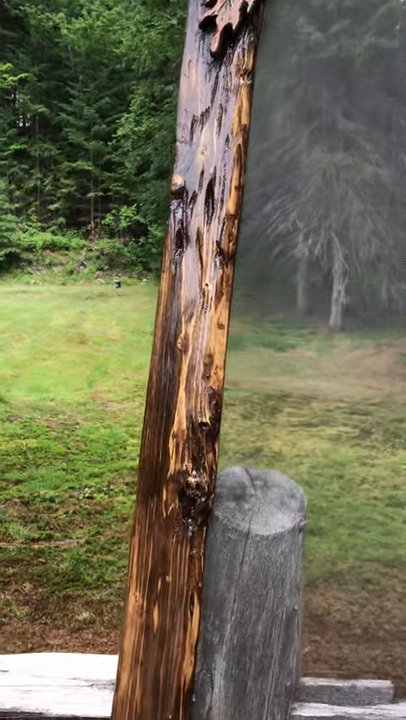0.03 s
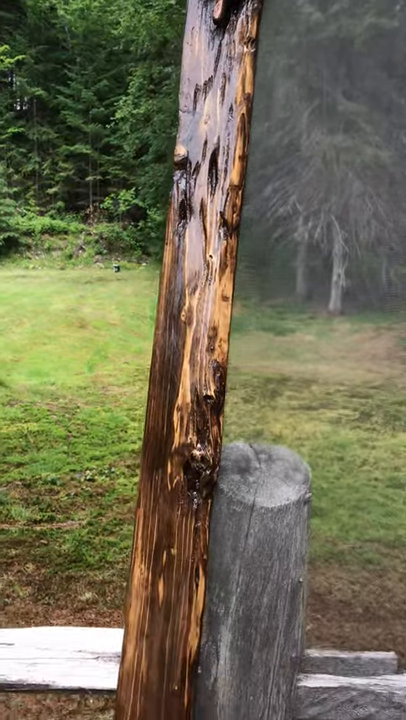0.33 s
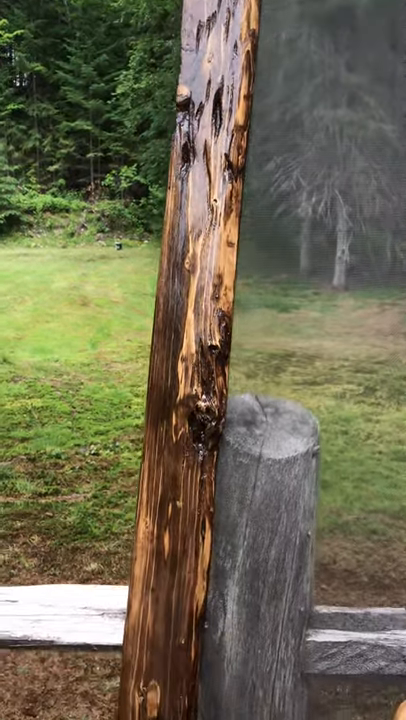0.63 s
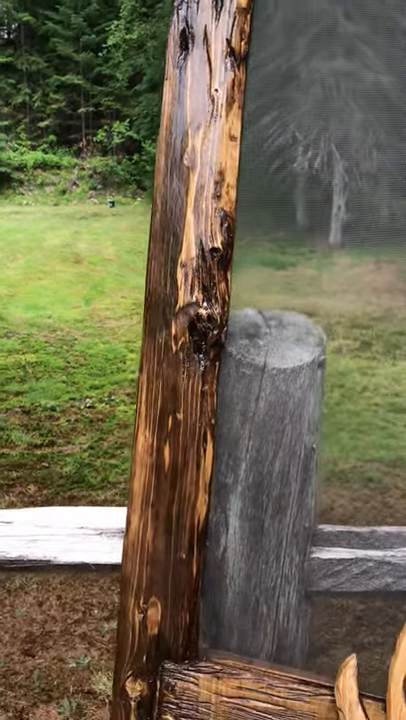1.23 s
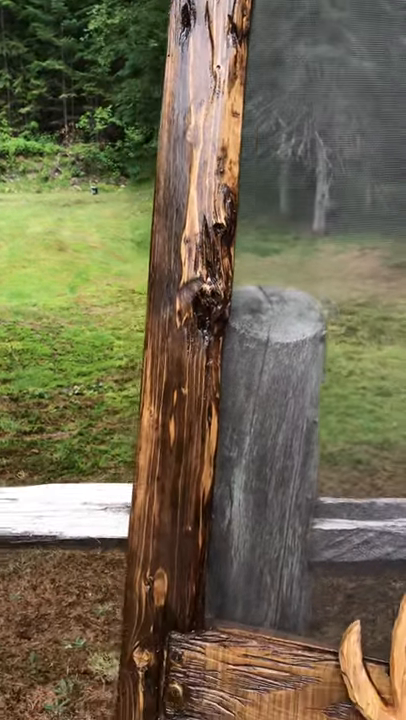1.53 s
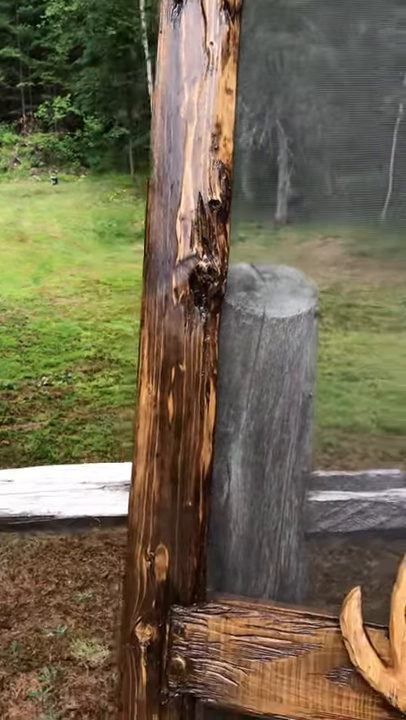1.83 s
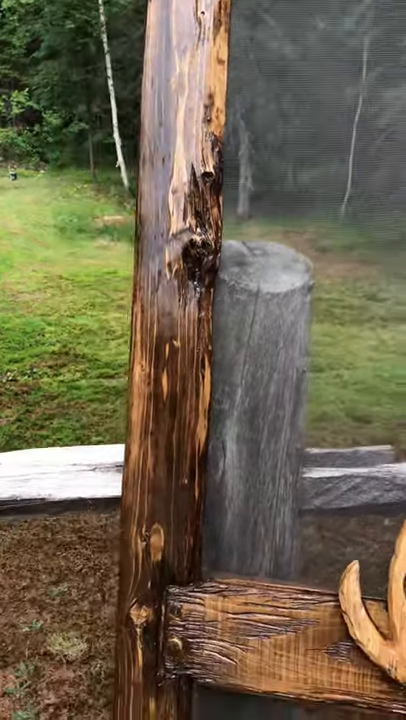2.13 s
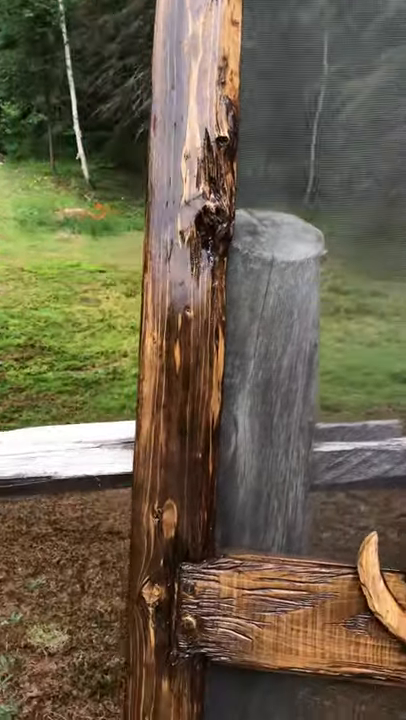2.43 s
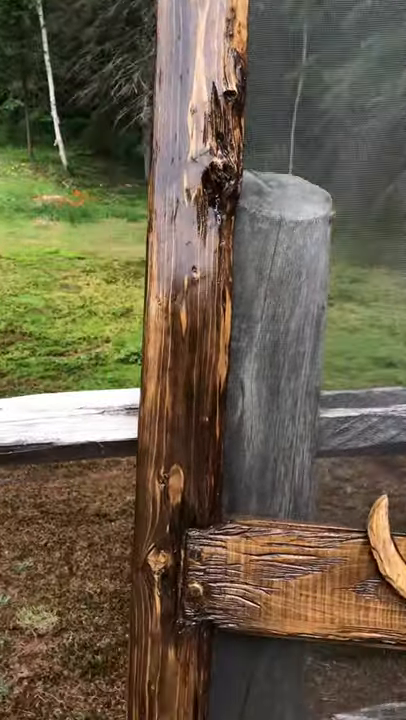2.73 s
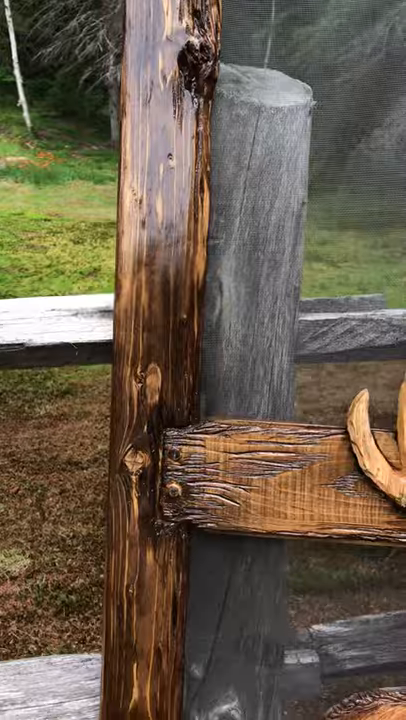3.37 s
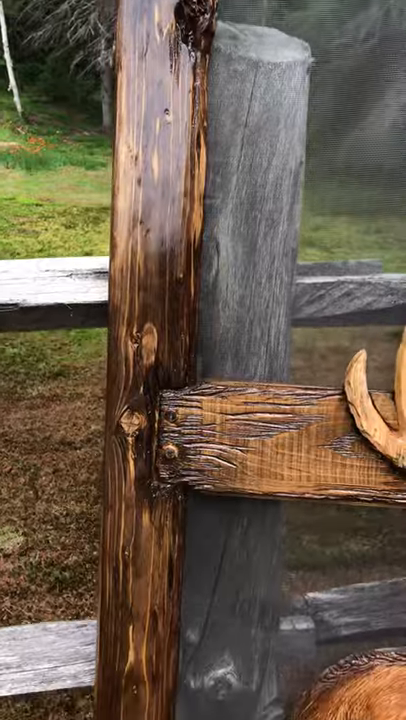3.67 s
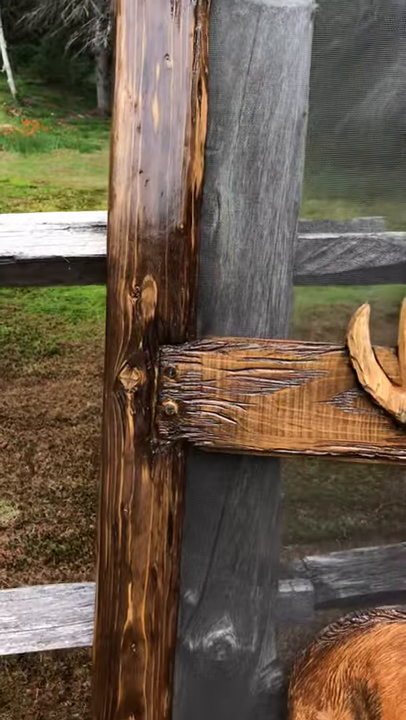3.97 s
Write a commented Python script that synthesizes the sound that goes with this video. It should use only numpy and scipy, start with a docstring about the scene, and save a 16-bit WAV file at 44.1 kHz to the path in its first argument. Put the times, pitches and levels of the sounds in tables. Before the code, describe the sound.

A high insect sizzle with short bird chirps and a low, far engine drone outdoors.

```python
"""A yard at the edge of a wood. From the start a far engine drones, insects sizzle high in the grass,
and small birds chip, peep and lisp among the trees. One nearer insect slowly comes in, its wing
strokes making a fast pulsing buzz. Around two seconds in come a light scuff and a soft knock close
by, then a breeze rumbles on the microphone. Last, the buzz grows louder, one bird sings a row of
buzzy notes, and a far trill swells."""
import sys
import numpy as np
from scipy import signal
from scipy.fft import rfft, irfft
from scipy.io import wavfile
from scipy.ndimage import uniform_filter1d

SR = 44100
rng = np.random.default_rng(int(sys.argv[2]) if len(sys.argv) > 2 else 0)


def pcm_store(signal):
    """Save signal as 16-bit PCM."""
    levels = np.round(np.clip(np.atleast_2d(signal), -1, 1) * 32767)
    wavfile.write(sys.argv[1], SR, levels.astype(np.int16).T)


N = 176400
TIME = np.arange(N) / SR


def from_db(db):
    """Turn decibels (dB) into a number to multiply a sound by."""
    return 10 ** (np.asarray(db) / 20)


def unit_power(x):
    """Scale a sound so that its average power is 1."""
    return x / np.sqrt(np.mean(x ** 2) + 1e-20)


def over_time(rows):
    """Join (seconds, value) rows with straight lines."""
    return np.interp(TIME, *np.transpose(rows))


def drift(rate_hz):
    """A smooth random wobble, about 1 in size; a higher rate wobbles faster."""
    step = 40  # samples between random points
    pole = np.exp(-2 * np.pi * rate_hz * step / SR)
    smooth = signal.lfilter([1], [1, -2 * pole, pole * pole], rng.standard_normal(N // step + 2002))
    settled = unit_power(smooth[2000:])
    return np.interp(np.arange(N) / step, np.arange(len(settled)), settled)


def noise(colour):
    """Noise of power 1. Its colour says how strong the low and high frequencies are."""
    hz, db = np.transpose(colour)
    freqs = np.maximum(np.fft.rfftfreq(N, 1 / SR), 1)
    gain = from_db(np.interp(np.log(freqs), np.log(hz), db))
    edge_fade = np.minimum(freqs / hz[0], 1) ** 2 * np.minimum(hz[-1] / freqs, 1) ** 2
    return unit_power(irfft(rfft(rng.standard_normal(N)) * gain * edge_fade, N))


def add(out, start_s, sound):
    """Mix a sound in at the given time."""
    start = max(int(start_s * SR), 0)
    out[start:start + len(sound)] += sound[:max(N - start, 0)]


def progress(length_s):
    """Run from 0 to 1 through a note."""
    return np.linspace(0, 1, max(int(length_s * SR), 2))


def whistle(hz, db, quaver):
    """A bird's note: an almost pure tone that follows a pitch path, trembles and fades in and out."""
    pitch = hz * (1 + quaver * drift(400)[:len(hz)])
    swell = np.sqrt(np.abs(np.sin(np.linspace(0, np.pi, len(hz)))))
    swell *= signal.windows.tukey(len(hz), .2)
    return from_db(db) * np.sqrt(2) * swell * np.sin(2 * np.pi * np.cumsum(pitch) / SR)


def arched_notes(rows, arch_hz=154, quaver_hz=124):
    """Short whistles whose pitch rises and falls again."""
    out = np.zeros(N)
    for start, length, top_hz, db in rows:
        pitch = top_hz - arch_hz * (2 * progress(length) - 1) ** 2
        add(out, start, whistle(pitch, db, quaver=quaver_hz / top_hz))
    return out


def among_trees(sound, echo_db, bounce_db, bounce_s=.03, echo_s=0.45):
    """The edge of the wood adds one clear bounce and a blurred echo to a sound."""
    t = np.arange(SR // 2) / SR
    tail = rng.standard_normal(len(t)) * from_db(-60 * t / echo_s) * (1 - np.exp(-t / 0.0037))
    echo = signal.fftconvolve(sound, tail / np.sqrt(np.sum(tail ** 2)))[:N]
    bounce = np.concatenate([np.zeros(int(bounce_s * SR)), sound])[:N]
    return sound + from_db(bounce_db) * bounce + from_db(echo_db) * echo


# The colour of the open air. Each row: frequency in Hz, relative strength in dB.
AIR_COLOUR = [(28, -8.5), (55, 1), (150, 3.5), (200, -6.5), (310, -7), (430, -14), (750, -16.5),
              (1080, -16), (1550, -19), (2500, -24.5), (3100, -24), (4800, -28.5), (6200, -29.5),
              (7300, -28), (12000, -34), (15500, -36.5)]
# How loud the air is. Each row: time in seconds, level in dB.
AIR_LOUDNESS = [(2.3, -59.5), (4, -60)]
def air():
    """The outdoor hush, which sinks a little in the second half."""
    return from_db(over_time(AIR_LOUDNESS)) * noise(AIR_COLOUR)


# Faint tones far away. Each row: pitch in Hz, level in dB.
DRONE_TONES = [(208, -83.5), (296, -76), (1040, -83.5)]
def drones(waver_hz=5.2):
    """Thin hums that waver at random."""
    turn = 2 * np.pi * TIME
    return sum(from_db(db) * (drift(waver_hz) * np.sin(hz * turn) + drift(waver_hz) * np.cos(hz * turn))
               for hz, db in DRONE_TONES)


# How fast the engine runs. Each row: time in seconds, speed in Hz.
ENGINE_PACE = [(0, 59), (0.35, 56.5), (0.7, 58), (1.05, 61), (1.35, 57), (1.7, 58), (2.0, 59), (2.75, 57.5),
               (3.2, 59), (4, 58.0)]
# How loud the engine is. Each row: time in seconds, level in dB.
ENGINE_LOUDNESS = [(0, -51.5), (0.12, -51.5), (0.3, -52.5), (0.6, -50.5), (0.86, -47), (1.02, -49),
                   (1.1, -51), (1.14, -47), (1.19, -52.5), (1.58, -48.5), (1.75, -46), (2.08, -50.5),
                   (2.23, -57), (2.5, -53), (2.8, -49), (3.02, -51), (3.3, -55.5), (3.6, -48), (4, -47.5)]
# The engine's tones. Each row: multiple of the speed, relative strength in dB.
ENGINE_TONES = [(1, -8.5), (2, -2), (3, -20.5), (5, -31.5), (6, -34)]
def engine(waver_db=.4):
    """The low tones of a far engine, each wavering on its way through the air."""
    turn = 2 * np.pi * np.cumsum(over_time(ENGINE_PACE)) / SR
    tones = np.zeros(N)
    for multiple, db in ENGINE_TONES:
        strength = from_db(db + waver_db * drift(15))
        tones += strength * np.sin(multiple * turn + rng.uniform(0, 2 * np.pi))
    return np.sqrt(2) * from_db(over_time(ENGINE_LOUDNESS)) * tones


# The colour of the breeze. Each row: frequency in Hz, relative strength in dB.
RUMBLE_COLOUR = [(30, -8), (45, 7), (70, -7.5), (110, 0), (200, -13.5), (500, -43)]
# The gusts. Each row: time in seconds, relative level in dB.
GUSTS = [(2.1, -54), (2.19, -64), (2.42, -75), (2.53, -44), (2.57, -59), (2.65, -45.5), (2.74, -55),
         (2.9, -55.5), (3.03, -53.5), (3.11, -59), (3.2, -48), (3.3, -72), (3.38, -72), (3.46, -51),
         (3.62, -69)]
def breeze(arrived_s=2.16, fade_in_s=0.1, gain_db=-2):
    """Gusts of wind rumble on the microphone."""
    rumble = noise(RUMBLE_COLOUR)
    even_rumble = rumble / np.sqrt(uniform_filter1d(rumble ** 2, size=3000))
    fade_in = np.clip(1 + (TIME - arrived_s) / fade_in_s, 0, 1)
    return fade_in * from_db(gain_db + over_time(GUSTS)) * even_rumble


# The colour of the far trill. Each row: frequency in Hz, relative strength in dB.
TRILL_COLOUR = [(4600, -8), (5500, 1.5), (6500, -1), (7200, 1), (8000, -33)]
# Its late swell. Each row: time in seconds, level in dB.
TRILL_SWELL = [(2.6, -95), (3.65, -78)]
def far_trill(flutter_db=3.0):
    """A distant bird, blurred into a high, fluttering hiss."""
    return noise(TRILL_COLOUR) * from_db(over_time(TRILL_SWELL) + flutter_db * drift(38))


# The dull and the gritty part of a touch. Each row: frequency in Hz, relative strength in dB.
BODY_COLOUR = [(200, -1), (1080, 1), (1400, -1), (1630, 3), (1820, 1), (2900, -5), (3300, -2), (4000, -10),
               (8000, -16.5), (15000, -37)]
GRIT_COLOUR = [(2000, -12), (4500, -9), (6300, -3), (7500, -10), (10000, -5), (15500, -4)]
# Light touches close by. Each row: peak time, rise and fall in seconds, body and grit levels in dB.
TOUCHES = [(.28, .03, 0.03, -72, -72), (1.765, 0.051, 0.04, -63.5, -71), (1.808, 0.022, 0.083, -66, -71),
           (1.805, 0.02, 0.011, -90, -61), (2.003, 0.013, 0.016, -60.5, -70),
           (2.035, 0.028, 0.16, -64.5, -81)]
def touches(grain_db=3.0):
    """A faint rustle, a scuff and a soft knock: each a dull body of noise with fine grit on top."""
    body = noise(BODY_COLOUR) * from_db(grain_db * drift(270))
    grit = noise(GRIT_COLOUR) * from_db(grain_db * drift(270))
    out = np.zeros(N)
    for peak, rise, fall, body_db, grit_db in TOUCHES:
        age = TIME - peak
        swell = np.exp(-np.maximum(-age / rise, age / fall))
        out += swell * (from_db(body_db) * body + from_db(grit_db) * grit)
    return out


# High peeps further off. Each row: start in seconds, length in seconds, top pitch in Hz, level in dB.
PEEP_NOTES = [(.815, 0.028, 5850, -71), (1.825, 0.034, 5860, -68), (2.446, 0.032, 5720, -70.5),
              (2.932, 0.044, 5700, -72.5), (3.522, 0.031, 5750, -71)]
# Thin lisps. Each row: start in seconds, starting pitch in Hz, level in dB.
LISP_NOTES = [(0.572, 8290, -67), (0.667, 8420, -64), (1.218, 8350, -66.5), (1.243, 8200, -67),
              (1.355, 8300, -67.5), (1.573, 8440, -66.5), (2.111, 8750, -67), (2.207, 8770, -65.5),
              (2.862, 8730, -68.5), (2.95, 8620, -66.5)]
def bird_calls(lisp_s=0.0394, fall_hz=642, bend=1.74):
    """Birds in the trees whistle arched peeps and falling lisps."""
    out = arched_notes(PEEP_NOTES)
    for start, start_hz, db in LISP_NOTES:
        pitch = start_hz - fall_hz * progress(lisp_s) ** bend
        add(out, start, whistle(pitch, db, quaver=0.0087))
    return among_trees(out, echo_db=-5, bounce_db=-6)


# Lower chips. Each row: start in seconds, length in seconds, top pitch in Hz, level in dB.
CHIP_NOTES = [(.274, 0.022, 3037, -65.5), (.807, 0.012, 3420, -72), (.85, 0.011, 2940, -64.5),
              (0.853, 0.015, 3470, -71), (0.865, 0.0056, 3050, -59.5), (1.863, 0.027, 3130, -67),
              (1.893, 0.013, 3110, -66), (2.465, 0.0245, 3130, -67), (2.965, 0.03, 3130, -67),
              (2.997, 0.02, 3270, -70), (3.559, 0.022, 3230, -65)]
def bird_chips():
    """A near bird gives very short arched notes, with less echo than the others."""
    return among_trees(arched_notes(CHIP_NOTES), echo_db=-7, bounce_db=-19)


# A song of buzzy notes. Each row: start in seconds, middle pitch in Hz, level in dB.
SONG_NOTES = [(2.615, 3980, -77.5), (2.736, 3950, -74), (2.862, 3950, -71.5), (2.989, 3970, -71.5),
              (3.115, 4000, -72), (3.245, 4060, -73), (3.374, 4090, -74), (3.503, 3840, -73),
              (3.64, 3770, -75), (3.777, 3810, -76)]
def bird_song(note_s=0.056, sweeps_per_s=88, lowest_hz=3514, slide_s=0.017, lead_s=.014):
    """A bird leads into each note with a quick downward slide, then buzzes in tiny upward sweeps."""
    out = np.zeros(N)
    sweep = (progress(note_s) * note_s * sweeps_per_s) % 1
    pulses = unit_power(np.sin(np.pi * sweep) ** 2)
    slide_hz = 5000 - 150 * progress(slide_s)
    for start, middle_hz, db in SONG_NOTES:
        add(out, start - lead_s, whistle(slide_hz, db=-77, quaver=0.013))
        pitch = middle_hz - (middle_hz - lowest_hz) * np.cos(np.pi * sweep)
        add(out, start, whistle(pitch, db, quaver=0.045) * pulses)
    return among_trees(out, echo_db=-3, bounce_db=-9)


# The colour of the insect chorus. Each row: frequency in Hz, relative strength in dB.
CHORUS_COLOUR = [(6800, -28), (7600, -17.5), (8250, -2), (8900, -2.5), (9650, -2.5), (10100, -7),
                 (10600, -16.5), (12500, -24.5)]
# How loud the chorus is. Each row: time in seconds, level in dB.
CHORUS_LOUDNESS = [(0, -68.5), (3, -69)]
def insect_chorus(flutter_db=1.1):
    """Many insects in the grass blur into one high sizzle."""
    return noise(CHORUS_COLOUR) * from_db(over_time(CHORUS_LOUDNESS) + flutter_db * drift(60))


# The colour of a wing's rasp before it sags. Each row: frequency in Hz, relative strength in dB.
WING_COLOUR = [(8300, -16), (9300, -7.5), (10150, 4.5), (10600, 0), (11200, -9), (12500, -22.5),
               (15000, -23)]
# How loud the buzz is. Each row: time in seconds, level in dB.
BUZZ_LOUDNESS = [(0, -93), (1.5, -76), (2.3, -80), (2.55, -72), (4, -71)]
def near_insect(strokes_per_s=27.24, rise_s=.004, fall_s=.008, sag_hz=1830, sag_s=0.01, rough_db=0.7):
    """Each wing stroke makes a short rasp that sags in pitch as the wing slows."""
    age = (TIME - 2.505) % (1 / strokes_per_s)  # seconds since the latest stroke began
    stroke = (1 - np.exp(-age / rise_s)) * np.exp(-age / fall_s)
    drop_hz = sag_hz * (1 - np.exp(-age / sag_s))
    shift_down = np.exp(-2j * np.pi * np.cumsum(drop_hz) / SR)  # lowers every frequency by drop_hz
    wing = np.real(signal.hilbert(noise(WING_COLOUR)) * shift_down)
    rasp = wing * stroke * from_db(-rough_db * drift(540))
    ground_echo = 0.3 * np.roll(rasp, int(0.002 * SR))
    return from_db(over_time(BUZZ_LOUDNESS)) * unit_power(rasp + ground_echo)


def scene():
    """All the sounds of the yard, added into one channel."""
    background = air() + drones() + engine() + breeze() + far_trill()
    foreground = touches() + bird_calls() + bird_chips() + bird_song() + insect_chorus() + near_insect()
    return (background + foreground)[None]


def record(dry):
    """Cut away the very highest treble."""
    cutoff_hz = 15750
    return signal.sosfilt(signal.ellip(12, .1, 70, cutoff_hz, fs=SR, output="sos"), dry)


dry = scene()
out = record(dry)
pcm_store(out)
```